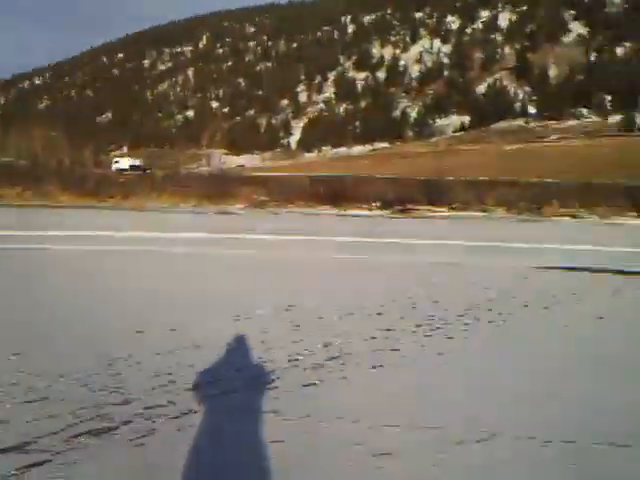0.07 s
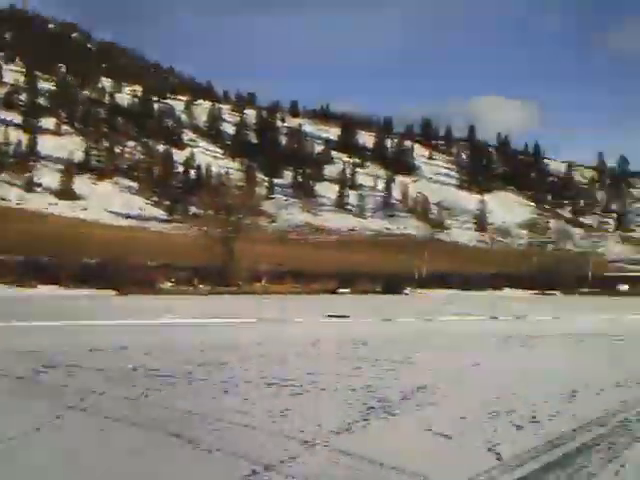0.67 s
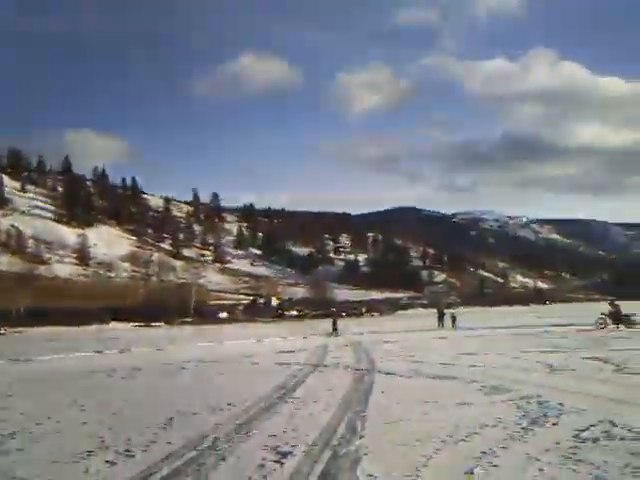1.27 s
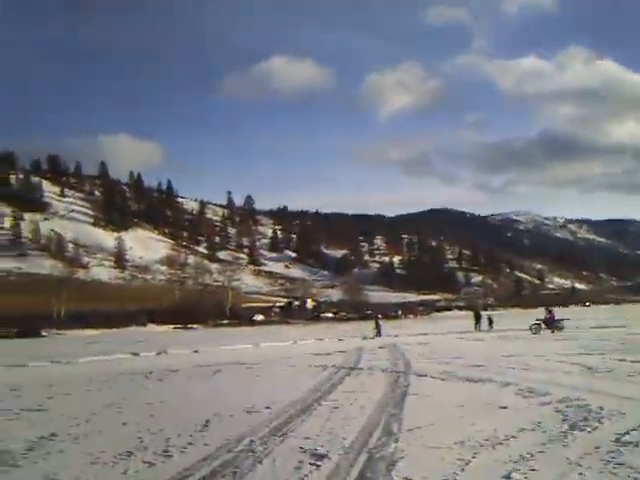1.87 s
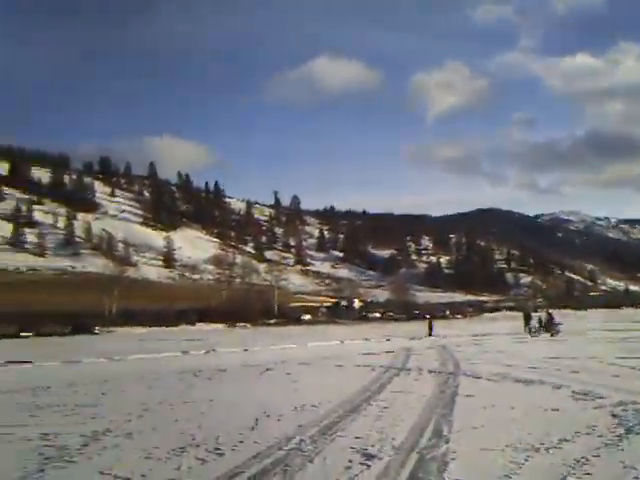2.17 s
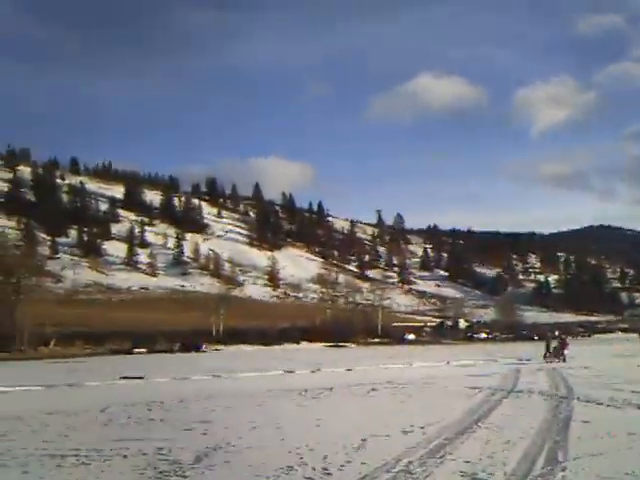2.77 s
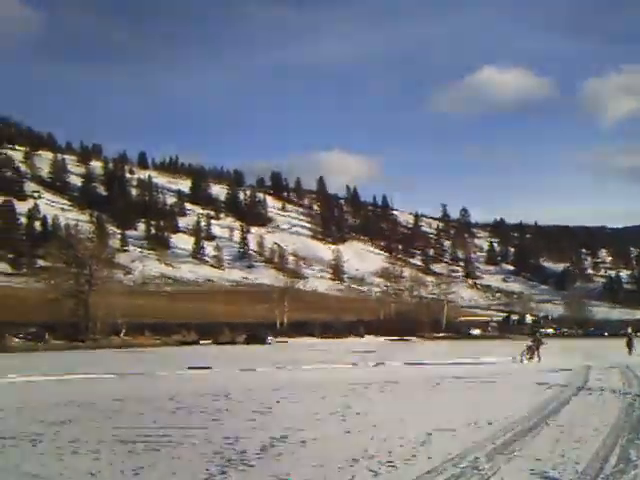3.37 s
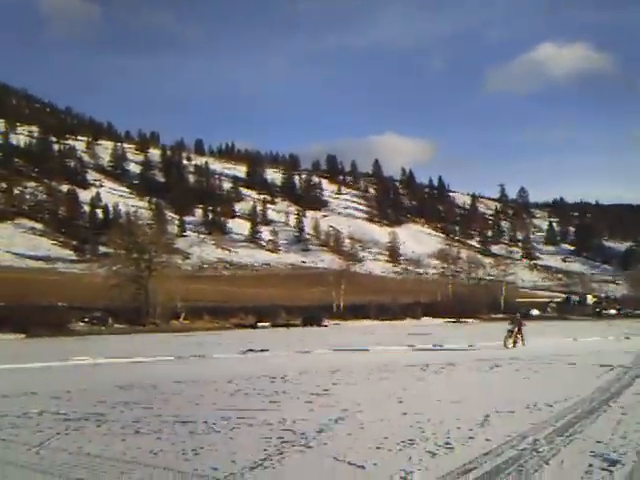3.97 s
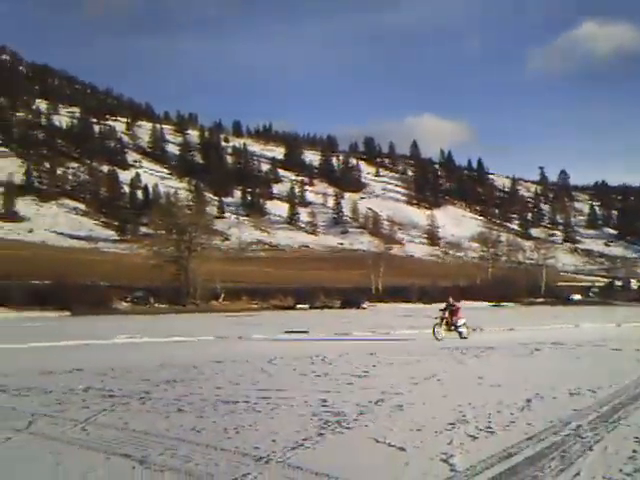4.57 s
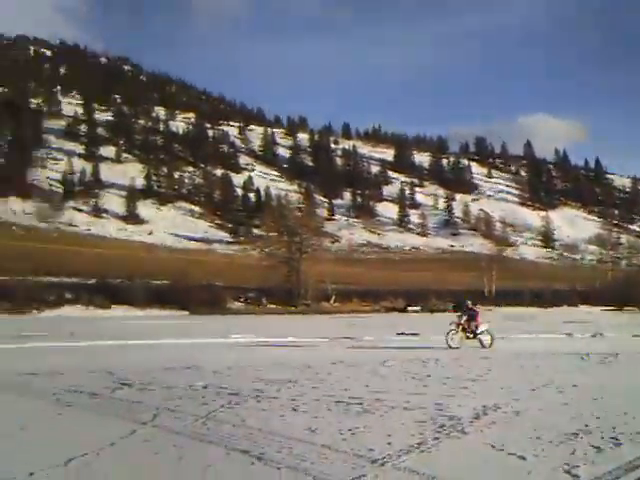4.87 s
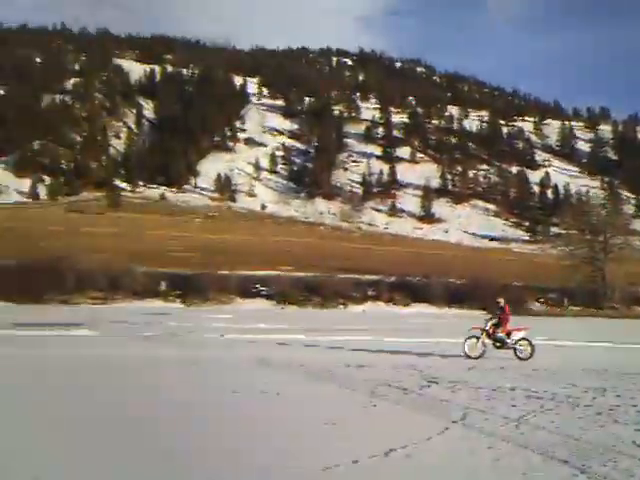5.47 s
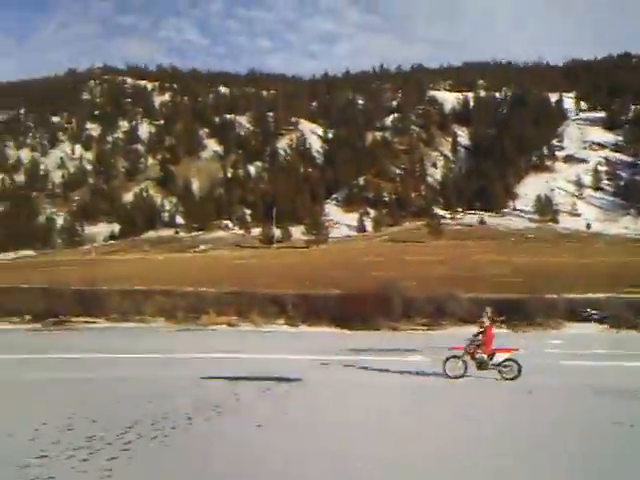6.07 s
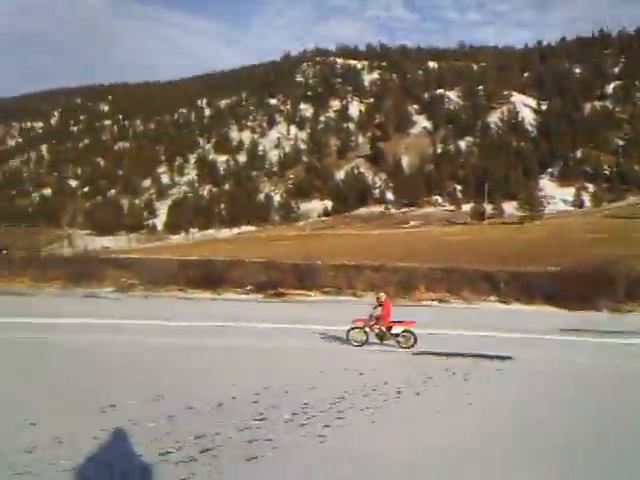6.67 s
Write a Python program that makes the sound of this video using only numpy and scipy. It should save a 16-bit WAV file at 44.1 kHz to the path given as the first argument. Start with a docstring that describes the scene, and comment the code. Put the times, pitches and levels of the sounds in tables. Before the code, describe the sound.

A single-cylinder dirt bike barks in sharp, raspy blips of throttle out on a frozen lake. It grows fainter, with a faint hiss of tyres scraping ice, then accelerates closer in several rising pulls. The throttle shuts and it coasts past with a low, sinking putter and light clatter. Wind rumbles on the small microphone throughout, with flapping gusts and dull thuds that thicken towards the end.

```python
"""Sharp blips of throttle bark from a single-cylinder four-stroke dirt bike circling on a frozen lake.
It runs far off, accelerates towards the listener in several pulls, then coasts past, throttle shut.
Each firing releases a pressure pulse and a turbulent jet: the periodic pulses make the beat, the jets
the rasp. Wind turbulence rumbles, flaps and thuds on a small camera's microphone, over a low hum."""
import sys
import numpy as np
from scipy import signal
from scipy.fft import rfft, irfft, next_fast_len
from scipy.io import wavfile
from scipy.ndimage import map_coordinates

SR = 44100
rng = np.random.default_rng(int(sys.argv[2]) if len(sys.argv) > 2 else 0)


def generate_wav(signal):
    """Clip the signal to [-1, 1] and save it as 16-bit WAV at the path in sys.argv[1]."""
    frames = np.transpose(np.atleast_2d(signal))
    scaled = np.clip(frames, -1, 1) * 32767
    pcm = np.round(scaled).astype(np.int16)
    wavfile.write(sys.argv[1], SR, pcm)


N = 296352
TIME_S = np.arange(N) / SR


def amp(db):
    """Amplitude ratio of a level in decibels."""
    return 10 ** (np.asarray(db) / 20)


def unit(x):
    """Normalisation to an rms of 1."""
    return x / np.sqrt(np.mean(x ** 2) + 1e-20)


def curves(rows):
    """Linear interpolation in time: one curve for each column after the first."""
    times, *columns = np.transpose(rows)
    return [np.interp(TIME_S, times, column) for column in columns]


def wobble(rate_hz):
    """Random modulation: a spline through rate_hz Gaussian values a second."""
    knots = rng.standard_normal(int(N * rate_hz / SR) + 4)
    return map_coordinates(knots, [TIME_S * rate_hz])


def after(time_s, fade_s):
    """A smooth step from 0 to 1 around time_s."""
    return .5 + .5 * np.tanh((TIME_S - time_s) / fade_s)


def coloured(x, spectrum, size=8192):
    """Minimum-phase filtering by a spectrum of (frequency_hz, gain_db) points."""
    hz, db = np.transpose(spectrum)
    gain_db = np.interp(np.log(np.fft.rfftfreq(size, 1 / SR) + 1), np.log(hz + 1), db)
    cepstrum = irfft(np.log(np.maximum(amp(gain_db), 1e-6)))
    cepstrum[1:size // 2] *= 2  # folding the cepstrum makes the filter causal
    cepstrum[size // 2 + 1:] = 0
    response = irfft(np.exp(rfft(cepstrum)))[:size // 2]
    return signal.fftconvolve(x, response)[:N]


def noise(spectrum):
    """Spectrally shaped Gaussian noise of rms 1."""
    return unit(coloured(rng.standard_normal(N), spectrum))


# Hollow response of the microphone port: frequency_hz, gain_db
PORT_RESPONSE = [(2050, 4.5), (2400, -0.5), (2600, -0.5), (2830, 8), (3200, -9), (3620, 3), (4100, -5.5),
                 (4600, -6), (5100, 6), (5700, -9), (6450, 10), (7200, -10.5), (9000, 4)]
def through_port(x):
    """Cavity resonance: the port imposes peaks and notches on the treble; the result has rms 1."""
    return unit(coloured(x, PORT_RESPONSE))


# The camera's hum: frequency_hz, level_db
HUM_TONES = [(26.9, -26)]
def camera_noise():
    """Self-noise: a low sinusoidal hum under a faint broadband hiss."""
    hum = sum(amp(db) * np.sqrt(2) * np.sin(2 * np.pi * hz * TIME_S) for hz, db in HUM_TONES)
    hiss = noise([(100, -3), (2000, 0), (4000, -8.5), (6500, -12), (8000, -15), (10500, -19.5)])
    return hum + amp(-58.5) * hiss


# Strength of the wind rumble: time_s, level_db
RUMBLE_LEVELS = [(.3, -22.5), (1.8, -24.5), (3.2, -21), (4.5, -18.5), (5.2, -20.5), (6.45, -23)]
# Spectrum of the rumble: frequency_hz, gain_db
RUMBLE_SPECTRUM = [(15, -4), (35, -8), (70, -9), (140, -9), (250, -10), (500, -17.5), (1000, -31),
                   (3000, -55.5), (8000, -80)]
def wind_rumble():
    """Turbulent pressure fluctuation at the microphone: low noise of uneven strength."""
    level_db, = curves(RUMBLE_LEVELS)
    lumps = amp(1.3 * wobble(20))
    return amp(level_db) * unit(lumps * noise(RUMBLE_SPECTRUM))


# Gusts at the port: start_s, length_s, level_db
GUST_EVENTS = [(.46, 0.092, -21.5), (0.575, 0.29, -24), (1.121, .12, -25), (1.455, .19, -25.5),
               (3.657, .14, -29.5), (4.723, 0.27, -20.5), (5.043, .16, -19), (5.314, .145, -17),
               (5.566, .2, -20), (6.561, 0.1346, -21)]
# Spectrum of a gust: frequency_hz, gain_db
GUST_SPECTRUM = [(50, -29), (130, -17.5), (250, -1), (400, 0), (700, -5), (1100, -16.5), (2000, -31.5),
                 (3000, -47), (5000, -63), (10000, -76.5)]
def wind_gusts(rise_s=.004, fall_s=.007):
    """Amplitude modulation: the noise of each gust rises, flaps rapidly and drops."""
    flutter = amp(3.3 * wobble(170) + 2.7 * wobble(30))
    flaps = unit(coloured(flutter * rng.standard_normal(N), GUST_SPECTRUM))
    envelope = sum(amp(db) * after(start_s, rise_s) * (1 - after(start_s + length_s, fall_s))
                   for start_s, length_s, db in GUST_EVENTS)
    return envelope * flaps


# Single eddies striking the microphone: start_s, peak_db, decay_s
EDDY_EVENTS = [(1.528, -14, 0.012), (1.596, -10, 0.0045), (2.119, -9.5, 0.0083), (3.197, -7.5, 0.014),
               (3.518, -3.5, 0.0092), (3.78, -5, .007), (4.048, -4, 0.0053), (4.754, -5.5, 0.0096),
               (4.977, -5.5, 0.0085), (5.139, -8.5, 0.017), (5.308, -5, 0.011), (5.409, -6.5, .008),
               (5.508, -3.5, 0.014), (5.657, -6.5, 0.012), (6.176, -6, .014), (6.561, -2, 0.018)]
def wind_eddies(rise_s=.00023, low_hz=130, high_hz=393):
    """Band-limited pressure transients: each eddy is a short, dull thud of turbulence."""
    out, t = np.zeros(N + SR), np.arange(SR // 5) / SR
    lowpass = signal.butter(3, high_hz, fs=SR, output="sos")
    highpass = signal.butter(2, low_hz, "high", fs=SR, output="sos")
    for start_s, peak_db, decay_s in EDDY_EVENTS:
        burst = rng.standard_normal(len(t)) * (1 - np.exp(-t / rise_s)) * np.exp(-t / decay_s)
        thud = signal.sosfilt(highpass, signal.sosfilt(lowpass, burst))
        out[round(start_s * SR):][:len(t)] += amp(peak_db) * thud / np.abs(thud).max()
    return out[:N]


# Snaps of wind at the port: start_s, peak_db, tick_db
SNAP_EVENTS = [(3.5217, -13.5, -60), (4.922, -9, -61.5), (5.355, -11.5, -56), (5.4077, -7.5, -34.5),
               (5.6318, -14.5, -57), (5.6607, -17.5, -59.5)]
# Spectrum of a snap: frequency_hz, gain_db
SNAP_SPECTRUM = [(300, -12.5), (900, 14), (1400, 7.5), (2500, -18.5), (4000, -36), (10000, -48)]
def wind_snaps(decay_s=.0038, tick_decay_s=.0006):
    """Impulsive noise with exponential decay: a midrange crack led by a broadband tick."""
    out, t = np.zeros(N + SR), np.arange(SR // 20) / SR
    for start_s, peak_db, tick_db in SNAP_EVENTS:
        snap = coloured(rng.standard_normal(len(t)) * np.exp(-t / decay_s), SNAP_SPECTRUM)
        tick = rng.standard_normal(len(t)) * np.exp(-t / tick_decay_s)
        start = round(start_s * SR)
        out[start:][:len(snap)] += amp(peak_db) * snap / np.abs(snap).max()
        out[start:][:len(t)] += amp(tick_db) * tick
    return out[:N]


# Strength of the hiss as the bike turns away: time_s, level_db
SCRAPE_LEVELS = [(1.0, -70.5), (1.25, -55), (1.55, -53), (1.9, -64), (2.3, -55.5), (2.9, -68), (3.3, -90.5)]
# Spectrum of that hiss: frequency_hz, gain_db
SCRAPE_SPECTRUM = [(800, -20), (2000, -0.5), (3300, -2), (5200, -1.5), (6500, -10), (9000, -17),
                   (11000, -24.5)]
def tyre_scrape():
    """Friction noise: a continuous hiss, as of tyres scraping ice."""
    level_db, = curves(SCRAPE_LEVELS)
    return amp(level_db + 1.3 * wobble(15)) * through_port(noise(SCRAPE_SPECTRUM))


# Flares of engine speed: centre_s, extra_firing_hz
WHEELSPINS = [(0.114, 10.3), (0.774, 19), (3.974, 9.7)]
def wheelspin(half_width_s=.072):
    """Loss of traction: the rear wheel slips on the ice and the firing rate briefly rises."""
    return sum(hz * np.exp(-((TIME_S - centre_s) / half_width_s) ** 2) for centre_s, hz in WHEELSPINS)


# Twists of the throttle, with levels at CRUISE_HZ and their drop on easing off:
# open_s, shut_s, open_firing_hz, shut_firing_hz, beat_db, rasp_db, drop_db
THROTTLE_PULLS = [(0, 0.268, 54.2, 64, -15.5, -32.5, 12.8), (0.373, .525, 47.59, 63.34, -13.5, -31, 11),
                  (0.601, 0.926, 48, 67.77, -15, -35, 7.7), (1.102, 1.237, 51.32, 53.25, -17.5, -33.5, 7),
                  (1.371, 1.647, 54.64, 63.6, -19, -37, 6.5),
                  (2.083, 2.381, 57.73, 68.13, -21.5, -42.5, 2.8),
                  (2.82, 3.218, 65.57, 71.1, -21.5, -42.5, 5), (3.367, 3.478, 52.97, 57.3, -16, -40, 14),
                  (3.568, 4.16, 45.47, 70.73, -16.5, -32, 6.2),
                  (4.278, 4.468, 58.99, 62.2, -17.5, -30.5, 4.2),
                  (4.6, 4.882, 58.19, 72.01, -13.5, -26.5, 7)]
# Rolling with the throttle shut: time_s, firing_hz
ROLLING_RATES = [(4.97, 51.97), (5.1, 49.14), (5.68, 46.88), (5.9, 43.98), (6.35, 44.15), (6.72, 40.46)]
CRUISE_HZ, COAST_START_S = 60, 4.91
def firing_rate():
    """The fundamental frequency while the tyre grips: it climbs in each pull and sags afterwards."""
    ramps = []
    for open_s, shut_s, open_hz, shut_hz, *_ in THROTTLE_PULLS:
        ramps += [(open_s, open_hz), (shut_s, shut_hz)]
    return curves(ramps + list(ROLLING_RATES))[0]


def exhaust_levels(rate_hz, opening_s=.028, closing_s=.022, swell_db=.5):
    """Source strength follows throttle and speed: beat and rasp in dB, the rasp growing faster."""
    corners, eased = [], None
    for open_s, shut_s, _, _, beat_db, rasp_db, drop_db in THROTTLE_PULLS:
        full = np.array([beat_db, rasp_db])
        if eased is not None:
            corners.append((open_s - opening_s / 2, *eased))
        eased = full - drop_db
        corners += [(open_s + opening_s / 2, *(full - swell_db / 2)),
                    (shut_s - closing_s / 2, *(full + swell_db / 2)),
                    (shut_s + closing_s, *eased)]
    beat_db, rasp_db = curves(corners)
    excess_hz = rate_hz - CRUISE_HZ
    return beat_db + .1724 * excess_hz, rasp_db + .5845 * excess_hz  # slopes in dB per Hz


def firings(cycles, scatter_db, jitter_s):
    """A quasi-periodic impulse train: one pulse per engine cycle, scattered in size and time."""
    on_time = np.interp(np.arange(1, int(cycles[-1])), cycles, np.arange(N))
    timing, strength = rng.standard_normal((len(on_time), 2)).T
    samples = np.clip(on_time + jitter_s * SR * timing, 0, N - 1).astype(int)
    return np.bincount(samples, amp(scatter_db * strength), N)


def bursts(pulses, decay_s, floor):
    """Pulse-modulated noise: it flares at each pulse and decays exponentially towards a floor."""
    envelope = unit(signal.lfilter([1], [1, -np.exp(-1 / (decay_s * SR))], pulses))
    return (envelope + floor) * rng.standard_normal(N)


# Soft puff of the coasting engine: frequency_hz, gain_db
PUFF_SPECTRUM = [(40, -41.5), (90, -15), (135, -1.5), (175, -2), (260, -11), (350, -8.5), (550, -35),
                 (1000, -33), (2000, -57.5), (4000, -75.5)]
# Clatter of chain and valves: frequency_hz, gain_db
CLATTER_SPECTRUM = [(200, -26.5), (600, -7.5), (1000, 2.5), (1300, -12.5), (1600, -6.5), (2000, -16.5),
                    (2500, -23), (3300, -17.5), (4600, -27), (6500, -35.5), (8000, -41), (10300, -47.5)]
def coasting_engine(cycles):
    """Engine overrun: weak uneven puffs, a booming third harmonic and clatter in step with the shaft."""
    pulses = firings(cycles, scatter_db=3, jitter_s=.0004)
    puffs = amp(-19) * unit(coloured(pulses, PUFF_SPECTRUM))
    boom = amp(-18.5 + .61 * wobble(8.1)) * np.sin(2 * np.pi * 3 * cycles)
    rattle = bursts(pulses, decay_s=.0016, floor=1.4)
    clatter = amp(-37.5) * through_port(coloured(rattle, CLATTER_SPECTRUM))
    return (puffs + boom + clatter) * after(COAST_START_S, fade_s=.086)


# Exhaust pipe resonances heard from behind: pitch_hz, bandwidth_hz, gain_db
PIPE_MODES = [(143.8, 41.5, -3), (231, 31.8, -0.5), (277, 48, 2), (401.5, 73, -1.5), (745, 100, -24),
              (1630, 260, -23)]
def exhaust_pipe(pulses, muffler_hz=2070, radiation_hz=90):
    """Modal resonance: pulses ring the pipe; the muffler absorbs treble, deep bass radiates poorly."""
    size = next_fast_len(N + SR // 2)
    f = np.fft.rfftfreq(size, 1 / SR)
    modes = sum((-1) ** k * amp(db) * 1j * f * width / (hz * hz - f * f + 1j * f * width)
                for k, (hz, width, db) in enumerate(PIPE_MODES))
    muffler = 1 / (1 + 1j * f / muffler_hz) ** 2
    open_end = 1j * f / (1j * f + radiation_hz)
    return unit(irfft(rfft(pulses, size) * modes * muffler * open_end, size)[:N])


def pressure_wave(cycles, harmonics, fall_db_per_octave):
    """Fourier series of a cycle with a sharp drop at blow-down; orders past the table roll off."""
    levels = [db for _, db in harmonics]
    last = len(levels)
    levels += [levels[-1] - fall_db_per_octave * np.log2(k / last) for k in range(last + 1, 30)]
    phase = np.linspace(0, 1, SR // 20)
    period = sum(-amp(db) * np.sin(2 * np.pi * k * phase) for k, db in enumerate(levels, 1))
    return unit(np.interp(cycles % 1, phase, period))


def exhaust(beat, pulses, levels, rasp_spectrum, steady_flow, crack=.75):
    """Jet noise: over the low beat, each blow-down cracks and releases a short burst of gas."""
    beat_db, rasp_db = levels
    gas = unit(bursts(pulses, decay_s=.0026, floor=steady_flow)) + crack * unit(pulses)
    rasp = through_port(coloured(gas, rasp_spectrum))
    return amp(beat_db) * beat + amp(rasp_db) * rasp


# Gas rasp from behind, from the side and from the front: frequency_hz, gain_db
REAR_RASP = [(200, -22), (600, -5.5), (900, -5), (1250, -4.5), (1600, 1), (2000, -9.5), (2400, -4),
             (2750, -20), (3300, -21.5), (4600, -20.5), (6500, -34.5), (8000, -33), (10300, -48)]
SIDE_RASP = [(200, -18), (600, 1.5), (800, 3.5), (1050, -3.5), (1600, 1.5), (2000, -10.5), (2400, -3),
             (2800, -18), (3300, -17), (4200, -19.5), (5100, -23.5), (6500, -32), (8000, -33), (10300, -44)]
FRONT_RASP = [(200, -22), (600, -0.5), (780, 2.5), (1050, -6), (1300, -1.5), (2000, -10), (2500, -10),
              (2800, -14), (3400, -16.5), (4300, -23), (5100, -22.5), (6500, -31.5), (8000, -34.5),
              (10300, -43.5)]
# Exhaust and intake together, from the side and from the front: harmonic_number, relative_db
SIDE_HARMONICS = [(1, -15.5), (2, -3.5), (3, -12.5), (4, 2), (5, -1.5), (6, -1.5), (7, -5.5), (8, -14.5),
                  (9, -17.5), (10, -12.5), (11, -13), (12, -20), (13, -25.5)]
FRONT_HARMONICS = [(1, -13), (2, -1.5), (3, 0.5), (4, 3.5), (5, -11), (6, 1.5), (7, -6.5), (8, -12.5),
                   (9, -19.5), (10, -11.5), (11, -15), (12, -11), (13, -15)]
def pulling_engine(cycles, levels):
    """Directivity: the timbre shifts as the bike shows its tail, its side far off, then its front."""
    pulses = firings(cycles, scatter_db=0, jitter_s=.00003)
    uneven = amp(.29 * wobble(45))  # no two burns are quite alike
    side_beat = uneven * pressure_wave(cycles, SIDE_HARMONICS, fall_db_per_octave=9.5)
    front_beat = uneven * pressure_wave(cycles, FRONT_HARMONICS, fall_db_per_octave=12)
    rear = exhaust(exhaust_pipe(pulses), pulses, levels, REAR_RASP, steady_flow=.41)
    side = exhaust(side_beat, pulses, levels, SIDE_RASP, steady_flow=1)
    front = exhaust(front_beat, pulses, levels, FRONT_RASP, steady_flow=.4)
    turned, nearing = after(1.05, fade_s=.079), after(3.3, fade_s=.089)
    powered = 1 - after(COAST_START_S, fade_s=.06)
    return ((1 - turned) * rear + (turned - nearing) * side + nearing * front) * powered


def scene():
    """Superposition of bike, wind and camera noise in one channel."""
    gripping_hz, flare_hz = firing_rate(), wheelspin()
    cycles = .35 + np.cumsum(gripping_hz + flare_hz) / SR  # the first cycle is already under way
    levels = exhaust_levels(gripping_hz + .49 * flare_hz)  # a spinning wheel loads the engine less
    bike = pulling_engine(cycles, levels) + coasting_engine(cycles) + tyre_scrape()
    wind = wind_rumble() + wind_gusts() + wind_eddies() + wind_snaps()
    return (bike + wind + camera_noise())[None]


def record(dry, offset=-.22, ceiling=.96, top_hz=11200):
    """Soft saturation and band limiting: the camera rounds peaks, and its converter sits off centre."""
    size = next_fast_len(N + SR // 2)
    biased = dry + offset
    rounded = biased / (1 + (biased / ceiling) ** 10) ** (1 / 10)
    passband = np.fft.rfftfreq(size, 1 / SR) < top_hz
    return offset + irfft(rfft(rounded - offset, size) * passband, size)[:, :N]


dry = scene()
out = record(dry)
generate_wav(out)
```